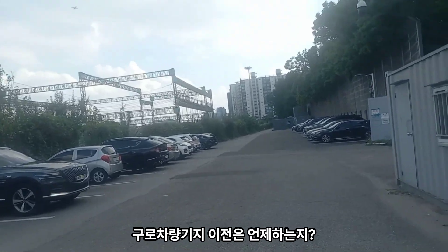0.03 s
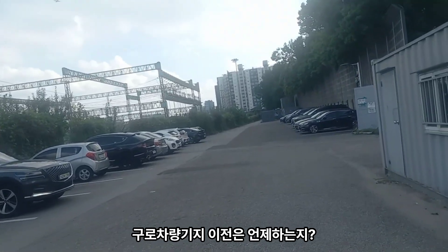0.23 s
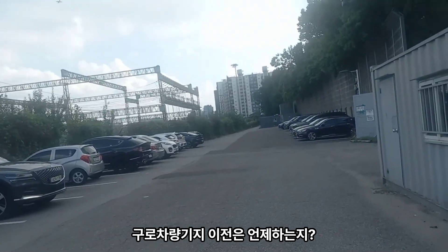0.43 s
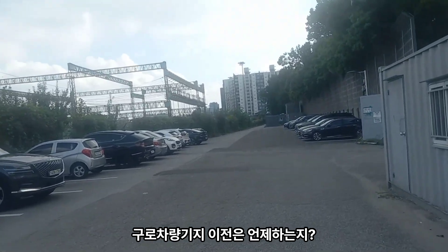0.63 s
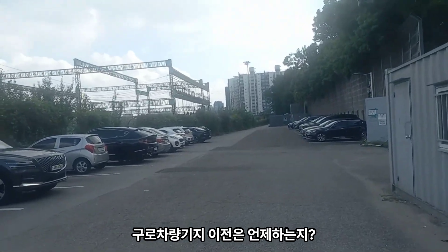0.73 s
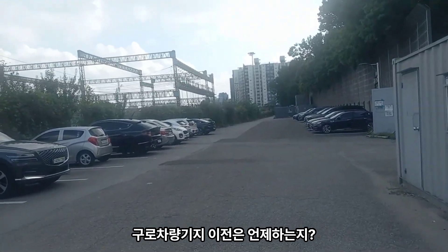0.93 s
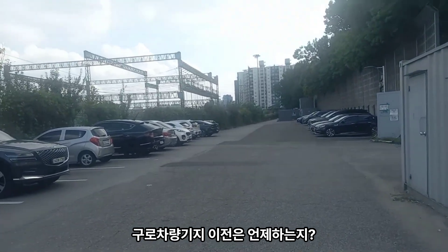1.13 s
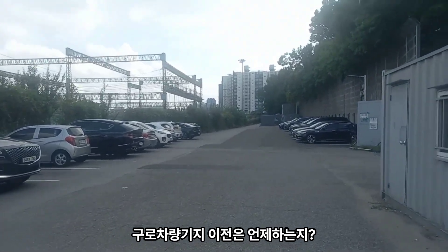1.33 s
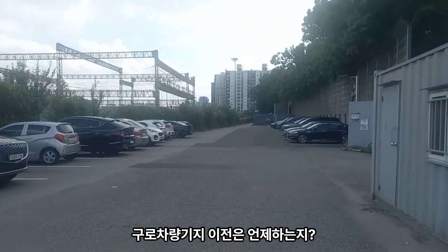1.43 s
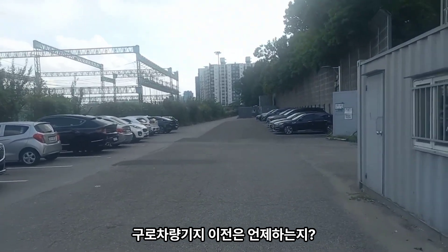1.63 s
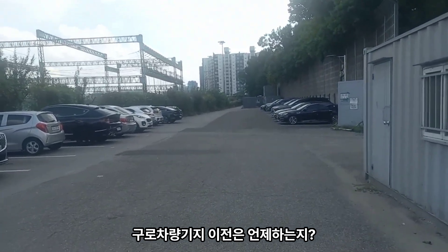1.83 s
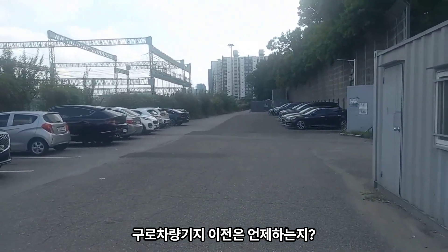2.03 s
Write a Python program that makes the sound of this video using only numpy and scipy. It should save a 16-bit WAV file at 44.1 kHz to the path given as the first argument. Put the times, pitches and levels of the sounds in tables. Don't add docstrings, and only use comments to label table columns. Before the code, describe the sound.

Jet aircraft rumbling high above an open car park, swelling toward the end amid wind buffeting

```python
import sys
import numpy as np
from scipy import signal
from scipy.fft import rfft, irfft, next_fast_len
from scipy.io import wavfile
from scipy.ndimage import uniform_filter1d

SR = 44100
rng = np.random.default_rng(int(sys.argv[2]) if len(sys.argv) > 2 else 0)


def how_loud(loudness_db):
    steps = np.asarray(loudness_db, float) / 20
    return 10 ** steps


def waveform_to_disk(signal):
    frames = np.transpose(np.atleast_2d(signal))
    scaled = np.clip(frames, -1, 1) * 32767
    samples = np.round(scaled).astype(np.int16)
    wavfile.write(sys.argv[1], SR, samples)


N = 91419
T = np.arange(N) / SR
SIZE = next_fast_len(N + 4096)
HZ = np.maximum(np.arange(SIZE // 2 + 1) * SR / SIZE, 1)


def level(x, db):
    return x * how_loud(db) / np.sqrt(np.mean(x ** 2))


def shape(table):
    hz, db = np.transpose(table)
    return np.interp(np.log(HZ), np.log(hz), db)


def curve(table, column=1):
    table = np.array(table)
    return np.interp(T, table[:, 0], table[:, column])


def colour(x, gain):
    return irfft(rfft(x, SIZE) * gain, SIZE)[..., :N]


def walk(rate_hz):
    hold = int(SR / rate_hz)
    steps = np.repeat(rng.standard_normal(N // hold + 1), hold)
    return 1.3 * uniform_filter1d(uniform_filter1d(steps, hold), hold)[:N]


def turbulence(table, flicker_db, rate_hz, tilt_db=0):
    spectrum = rfft(rng.standard_normal(SIZE)) * how_loud(shape(table))
    position = np.clip(2 * np.log2(HZ / 32), 0, 16)
    out = 0
    for k in range(17):
        overlap = np.clip(1 - np.abs(position - k), 0, 1)
        band = irfft(spectrum * overlap, SIZE)[:N]
        out = out + band * how_loud(flicker_db * walk(rate_hz) + tilt_db * (k - 3) / 2)
    return out


def ports(x, lag_s):
    return np.array([x, colour(x, np.exp(-2j * np.pi * HZ * lag_s))])


def hiss():
    # (frequency [Hz], density [dB per Hz])
    hiss_colour = [(10400, -60), (10700, -8), (12000, -8), (13500, -9), (13800, -17), (14200, -4),
                   (15000, -2), (15400, 0)]
    return np.array([level(turbulence(hiss_colour, 3.5, 25), -89) for _ in range(2)])


def wind():
    # (frequency [Hz], density [dB per Hz])
    buffet_colour = [(30, -7), (75, 7.5), (130, 3.5), (220, -5), (350, -10), (480, -21.5), (800, -57)]
    # (time [s], left level [dB], right level [dB])
    gust_levels = [(0, -17.5, 4), (.16, 4, -7), (.3, -9.5, -19), (.41, -24.5, 0), (.45, -19, -1.5),
                   (.5, 0, 6.5), (.6, -5.5, 5.5), (.72, -14, 8.5), (.78, -9, -17), (.95, -9, 1.5),
                   (1.15, -7, 0.5), (1.36, -2, 7), (1.45, -19, 2), (1.52, -21.5, 4), (1.72, -10, 6.5),
                   (1.81, 7, -26.5), (1.9, -20.5, -20), (2.07, -19.5, -14.5)]
    # (time [s], peak level [dB], port [0 left, 1 right])
    thump_events = [(0.158, -10.5, 0), (.415, 1, 1), (0.488, -11.5, 1), (0.502, 5, 1), (0.562, -16.5, 1),
                    (0.621, -8, 1), (.721, -2, 1), (1.297, -12, 1), (1.521, -6, 1), (1.664, -16.5, 1),
                    (1.812, -12.5, 0)]
    buffet_db, tilt_per_gust = -18.5, .3
    lumps = []
    for column in (1, 2):
        gust_db = curve(gust_levels, column)
        noise = turbulence(buffet_colour, 0.77, 7.8, 0.16 * tilt_per_gust * gust_db)
        lumps.append(level(noise * how_loud(2.8 * walk(44.98)), buffet_db) * how_loud(gust_db))
    kicks = np.zeros((2, N))
    for s, db, port in thump_events:
        kicks[int(port > .5), int(s * SR)] = -how_loud(db)
    gain = how_loud(shape(buffet_colour))
    return np.array(lumps) + colour(kicks, gain / np.mean(gain))


def near_roar():
    # (frequency [Hz], density [dB per Hz])
    near_colour = [(300, -5.5), (500, -5), (750, 0), (1000, -5), (1420, -2), (2100, -7), (3000, -33.5),
                   (5000, -34.5)]
    # (time [s], level [dB])
    approach = [
        (0, -26),
        (1.2, -5),
        (1.5, -3.5),
        (1.75, 1),
        (2.07, 4),
    ]
    near_db, lag_s = -26.5, 0.00023
    whine_hz, whine_width_hz, whine_db = 1420, 12, -14
    approach_db = curve(approach)
    whine = colour(rng.standard_normal(N), 1 / (1 + ((HZ - whine_hz) / whine_width_hz) ** 2))
    body = level(turbulence(near_colour, 2.4, 9.14), 0)
    body = body + level(whine, whine_db) * how_loud(approach_db)
    return ports(body * how_loud(near_db + approach_db), lag_s)


def surges():
    # (time [s], pitch [Hz], peak level [dB], left minus right [dB])
    eddies = [(0.034, 99.7, -11.5, -6.5), (0.059, 375, -21.5, -2), (0.085, 324, -21, -4),
              (0.11, 170, -17, 1), (0.155, 98.7, -12.5, 16.5), (0.2, 320, -18.5, -3.5),
              (0.21, 85.7, -14.5, -13), (0.304, 321, -21, -2.5), (0.479, 94, -16, -7.5),
              (0.489, 333.7, -22, -12), (0.539, 218, -18, -2.5), (0.549, 165.6, -15.5, 0),
              (0.57, 321, -23.5, -5.5), (0.624, 234, -17.5, -4.5), (0.685, 88, -13.5, -2),
              (0.729, 82.2, -18, -29), (0.733, 324.4, -23, -7), (0.774, 103, -13.5, -5),
              (0.827, 116.5, -13, -1), (0.993, 135, -14.5, -2), (1.058, 180.6, -18.5, -5.5),
              (1.107, 163, -15, -6), (1.124, 101.5, -16, -7), (1.153, 173.3, -19.5, -7),
              (1.253, 110.5, -21.5, -4.5), (1.253, 175, -17, 2.5), (1.302, 179, -12, -6.5),
              (1.347, 110, -10, -11.5), (1.447, 90, -13.5, -16), (1.477, 170.4, -23, -0.5),
              (1.512, 92.5, -17, -2.5), (1.523, 186.3, -14.5, -14), (1.521, 239, -14, -11.5),
              (1.591, 338, -16, -1), (1.641, 255, -21, -4), (1.691, 302, -22.5, -3.5),
              (1.706, 100.3, -13.5, -8.5), (1.766, 243, -16.5, 0), (1.765, 335.5, -21, -2.5),
              (1.811, 158, -18.5, 5.5), (1.815, 106.6, -12.5, 4), (1.916, 94, -14.5, -1.5),
              (1.921, 309, -24.5, -2), (1.95, 102.7, -15.5, -3), (1.961, 344.5, -19.5, 1),
              (2.03, 175.2, -15, -2)]
    trim_db, length_s, glide_depth = -.5, .022, .04
    skew_cycles = .12
    out = np.zeros((2, N))
    draws = rng.standard_normal((len(eddies), 3))
    for (s, hz, db, pan_db), (phase, glide, skew) in zip(eddies, draws):
        u = T - s
        cycles = hz * u * (1 + glide_depth * glide * u / length_s) + phase
        cycles = cycles + skew_cycles * skew * np.array([[1], [0]])
        swell = np.exp(-(u / length_s) ** 2) * np.sin(2 * np.pi * cycles)
        lean = how_loud(np.clip(pan_db, -14, 14))
        out += how_loud(db + trim_db) * swell * np.array([[lean], [1]]) * 2 / (1 + lean)
    return out


def jet():
    # (frequency [Hz], density [dB per Hz])
    rumble_colour = [(40, -22.5), (75, -1.5), (125, 3.5), (180, -1), (215, -3.5), (330, -6.5), (430, -10.5),
                     (900, -34.5)]
    roar_colour = [(300, -21.5), (600, -7.5), (1000, 6.5), (1500, 0), (2200, 6), (3200, -15), (5000, -45.5),
                   (7200, -67.5)]
    scatter_colour = [(200, -4), (450, -9.5), (700, -10.5), (1200, -16.5), (2200, -14.5), (2650, -16),
                      (3050, -26.5), (7200, -38.5)]
    # (time [s], level [dB])
    passing = [
        (0, 1.5),
        (.35, 2.5),
        (.7, 2),
        (1.0, 1),
        (1.3, 2),
        (1.6, 2),
        (1.85, 2),
        (2.07, 5),
    ]
    rumble_db, roar_db, scatter_db = -23, -32.5, -27
    echo_s, echo_db, roar_lag_s = 0.012024, -10, 0.000495
    echo = 1 + how_loud(echo_db) * np.exp(-2j * np.pi * HZ * echo_s)
    rumble = colour(turbulence(rumble_colour, 0.94, 4.696), echo)
    rumble = level(rumble, rumble_db) * np.ones((2, 1))
    roar = ports(level(turbulence(roar_colour, 0.95, 5.09), roar_db), roar_lag_s)
    scatter = np.array([level(turbulence(scatter_colour, 3.4, 3.2), scatter_db) for _ in range(2)])
    passing_db = curve(passing)
    return rumble * how_loud(passing_db) + (roar + scatter) * how_loud(0.58 * passing_db)


def scene():
    # (frequency [Hz], level [dB])
    left_port = [(100, 1.5), (400, 0), (800, -1), (1500, -4), (2200, -11.5), (3000, -5.5), (4500, -13.5),
                 (7000, -18)]
    port_gain = how_loud(np.array([shape(left_port), 0 * HZ]))
    return colour(jet() + near_roar(), port_gain) + wind() + surges()


def bump(hz, width_hz, db):
    return db * np.exp(-((HZ - hz) / width_hz) ** 2)


def fold_treble(x):
    fold_hz, top_hz, fold_db = 5100, 7330, -9
    roll_hz, roll_db_per_hz = 6900, -.055
    pan_db, sway_db, flip_limit = -3, 3.5, 1.6
    out = colour(x, HZ < fold_hz)
    edges = np.r_[np.linspace(fold_hz, top_hz - 360, 7), top_hz - 240, top_hz - 120, top_hz]
    roll = how_loud(fold_db + roll_db_per_hz * np.maximum(HZ - roll_hz, 0))
    sway, reach = walk(24), walk(16)
    for k, (lo, hi) in enumerate(zip(edges, edges[1:])):
        lean = pan_db + sway_db * (.7 * sway + .7 * walk(30))
        lean_db = lean * np.clip(-2 * lean - 2, 0, 1)
        flip = np.clip(4 * (flip_limit - walk(47)), -1, 1)
        alive = np.clip(3 * (reach + 1.5 - 1.1 * (k - 6)), 0, 1) if k >= 6 else 1
        band = colour(x[1], roll * (HZ >= lo) * (HZ < hi)) * alive
        out = out + band * np.array([flip * how_loud(lean_db / 2), how_loud(-lean_db / 2)])
    return out


def roll_off(x):
    return signal.sosfilt(signal.butter(12, 15740, fs=SR, output="sos"), x)


def record(dry):
    bass_cut_hz, bass_cut_order = 71.6, 4.8
    ceiling, fade_in_s = 1.15, .0015
    case = how_loud(bump(1794, 84, -3.5) + bump(6500, 400, 3))
    bass_cut = 1 / np.sqrt(1 + (bass_cut_hz / HZ) ** (2 * bass_cut_order))
    x = colour(dry, case * bass_cut)
    x = ceiling * np.tanh(x / ceiling)
    fade = np.sin(np.pi / 2 * np.clip(T / fade_in_s, 0, 1)) ** 2
    mix = (fold_treble(x) + hiss()) * fade
    return roll_off(mix)


dry = scene()
out = record(dry)
waveform_to_disk(out)
```